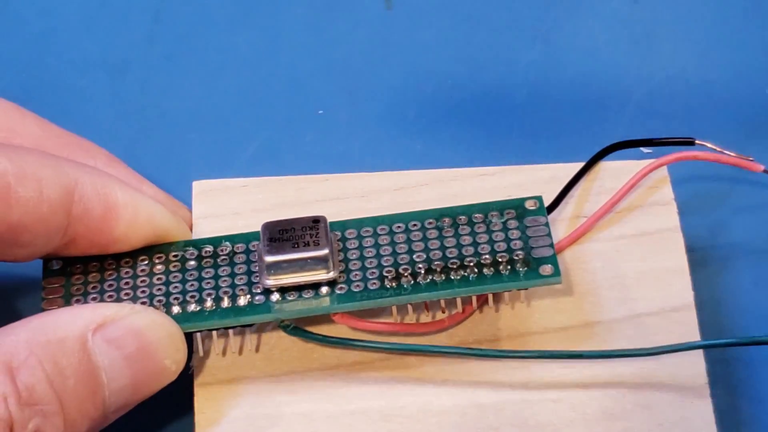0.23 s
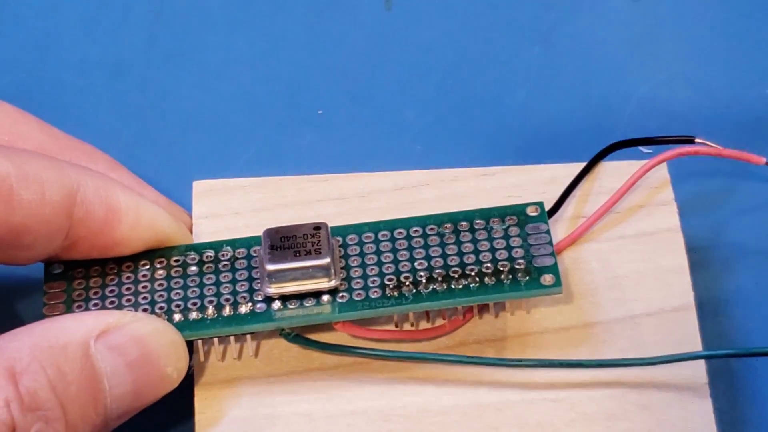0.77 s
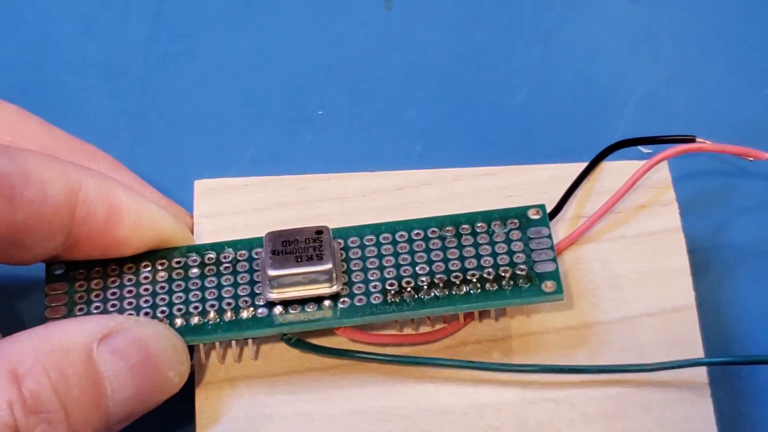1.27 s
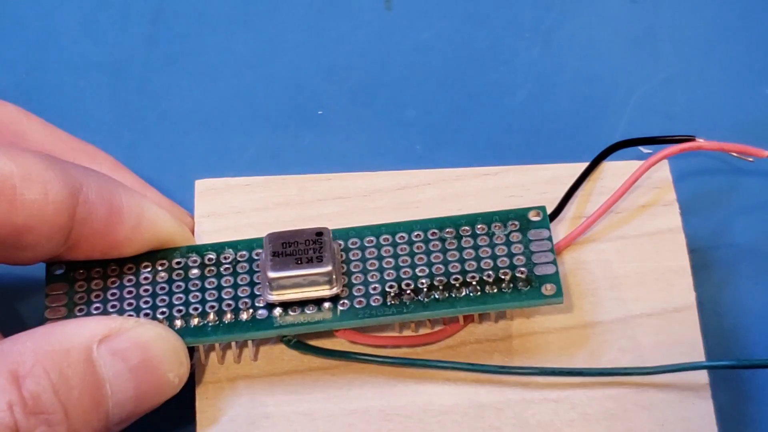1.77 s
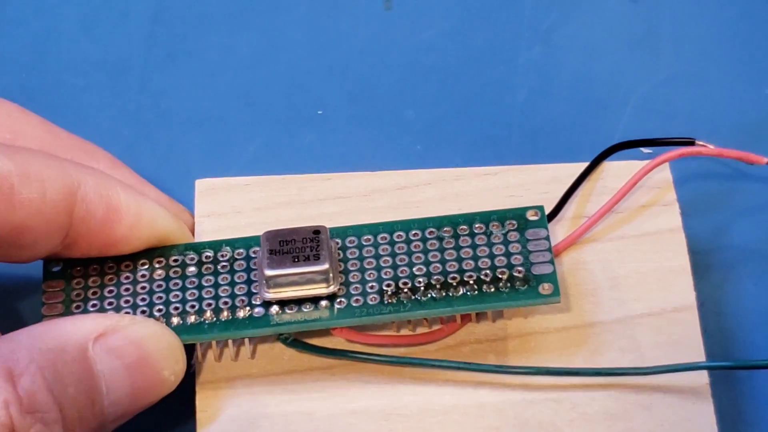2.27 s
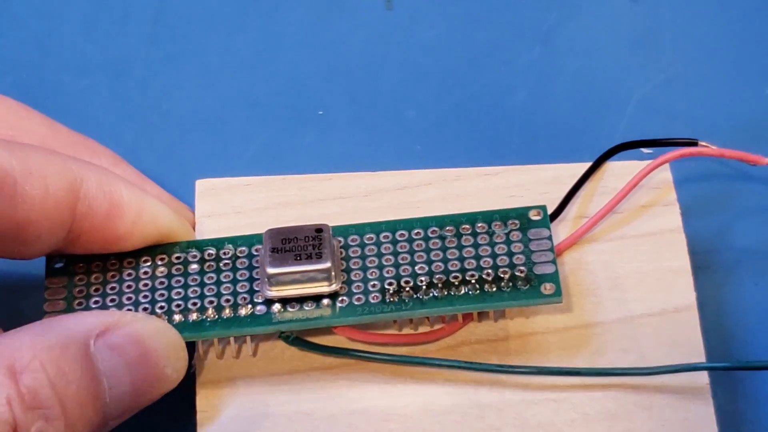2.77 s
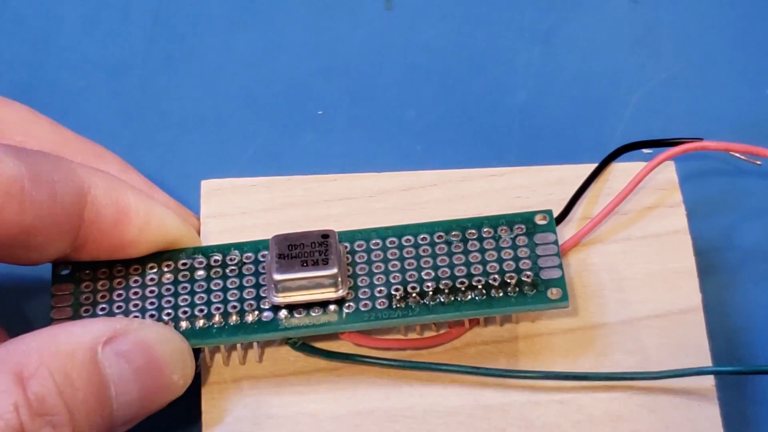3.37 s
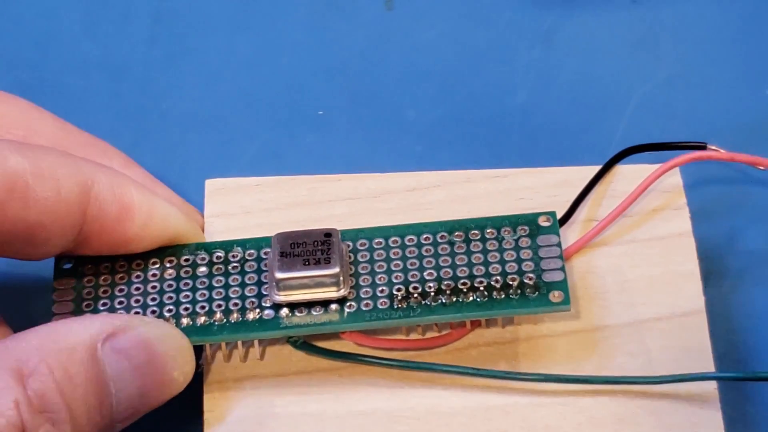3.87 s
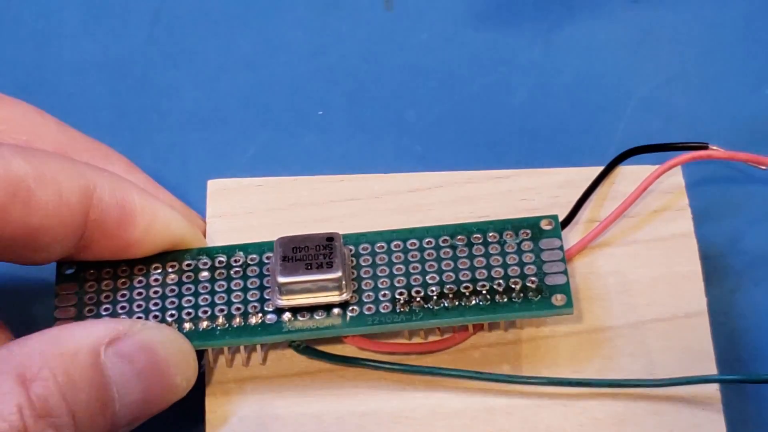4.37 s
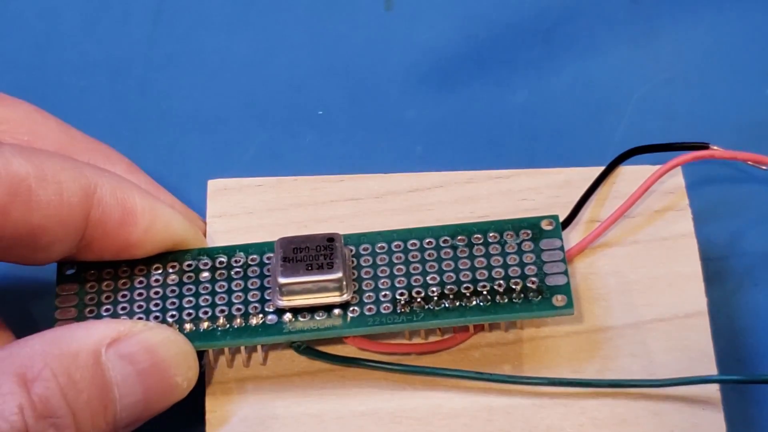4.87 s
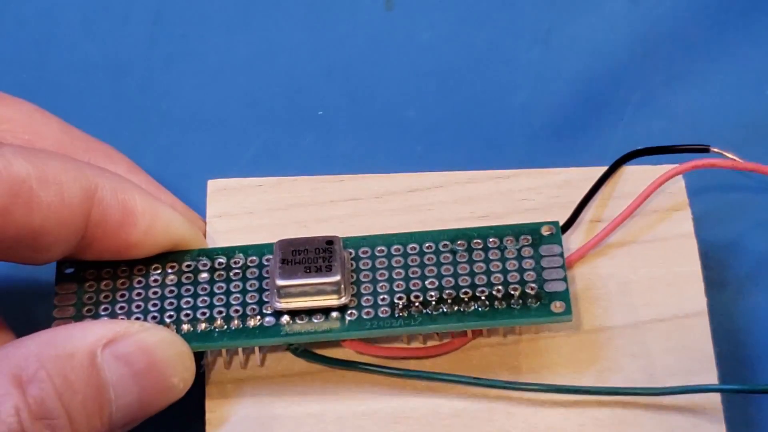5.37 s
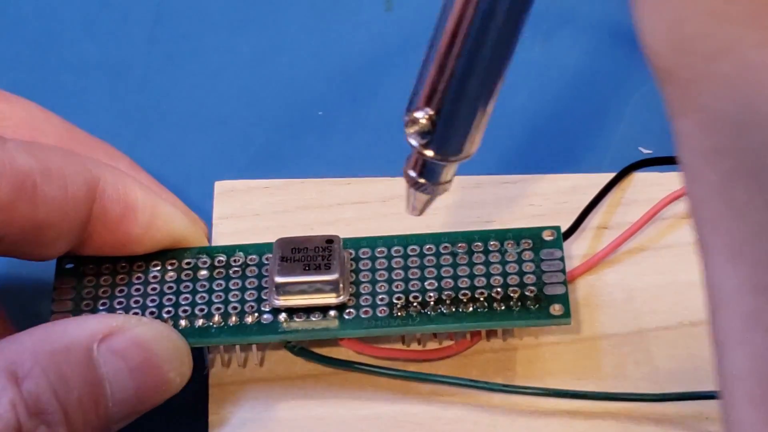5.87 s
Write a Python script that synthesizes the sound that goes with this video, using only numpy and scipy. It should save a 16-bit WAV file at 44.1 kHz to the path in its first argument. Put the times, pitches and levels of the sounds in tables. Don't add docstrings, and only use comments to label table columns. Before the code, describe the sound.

Dry skin and sleeve rubbing with dull bench knocks opens, fading to quiet handling. A hand-held plunger tool is then cocked and released three times, each a sharp click answered by a harder, heavier crack, with brief rattle and faint spring ringing. Between pairs are ticks, soft bumps and piston scrapes. Close, dry microphone, short room reflections, soft fan hum, and a tiny wire ping at the end.

```python
import sys
import numpy as np
from scipy import signal
from scipy.fft import rfft, irfft
from scipy.io import wavfile
from scipy.ndimage import uniform_filter1d

SR = 44100
rng = np.random.default_rng(int(sys.argv[2]) if len(sys.argv) > 2 else 0)


def to_wav(s):
    ch = np.atleast_2d(s).T
    pcm = np.round(np.clip(ch, -1, 1) * 32767)
    wavfile.write(sys.argv[1], SR, pcm.astype(np.int16))


def boost_factor(decibels):
    exponent = np.asarray(decibels, float) / 20
    return 10 ** exponent


N = 269704


def evened(x):
    return x / np.sqrt(np.mean(x ** 2) + 1e-20)


def read(points, hz):
    f, value = np.transpose(points)
    return np.interp(np.log(hz + 1), np.log(f + 1), value)


def add(mix, s, sound):
    part = mix[round(s * SR):][:len(sound)]
    part += sound[:len(part)]


def shaped(gain):
    return evened(irfft(rfft(rng.standard_normal(N)) * gain, N))


def coloured(points):
    return shaped(boost_factor(read(points, np.fft.rfftfreq(N, 1 / SR))))


def ring(modes, stretch, damping):
    t = np.arange(1024) / SR
    out = np.zeros(len(t))
    for hz, width, db in modes:
        out += boost_factor(db) * np.exp(-np.pi * width * damping * t) * np.sin(2 * np.pi * hz * stretch * t)
    return out


# frequency in Hz, density in dB per Hz.
AIR = [(15, -41.5), (25, -27.5), (87, -1.5), (172, -4), (304, -9), (368, -3), (524, -21), (1030, -14),
       (2400, -27), (4480, -27.5), (6210, -23.5), (7710, -22.5), (9330, -24), (15200, -49), (16500, -47)]
# centre in Hz, width in Hz, level in dB.
FANS = [
    (59, 20, -73.5),
    (102.4, 14, -69),
    (231, 130, -70.5),
    (9600, 300, -87),
    (9500, 50, -95),
]


def room_tone():
    hz = np.fft.rfftfreq(N, 1 / SR)
    out = boost_factor(-69.5) * coloured(AIR)
    for centre, width, db in FANS:
        out += boost_factor(db) * shaped(1 / (1 + (2 * (hz - centre) / width) ** 2))
    return out


# frequency in Hz, t60 in seconds.
REVERB = [(100, 0.6), (500, 0.33), (1500, 0.12), (3000, 0.18), (4500, 0.21), (6500, 0.097), (10000, 0.038),
          (15000, 0.043)]
# delay in seconds, gain.
ECHOES = [(.0025, 0.23), (.004, -0.1), (.007, 0.15), (.0095, -.15), (0.0128, -0.0099)]


def room(x, wet_db):
    taps = np.zeros(SR // 2)
    at = np.arange(120, SR // 2 - 12, 12)
    taps[at + rng.integers(0, 12, len(at))] = rng.choice([-1., 1.], len(at))
    hz, t, z = signal.stft(taps, SR, nperseg=128)
    decay = boost_factor(-60 * t / read(REVERB, hz)[:, None])
    tail = signal.istft(z * decay, SR, nperseg=128)[1]
    tail *= boost_factor(wet_db) / np.linalg.norm(tail)
    for s, gain in ECHOES:
        tail[round(s * SR)] += gain
    return signal.fftconvolve(x, tail)[:N]


# frequency in Hz, level in dB.
RUB = [(900, -30.5), (1300, 3), (1900, 3), (2400, -1), (2900, 2), (3500, -16), (4500, -45)]
HISS = [(2500, -35.5), (3600, -8.5), (4100, -1), (4700, -2.5), (5500, 1.5), (6200, 1.5), (7200, -0.5),
        (8200, -3.5), (10000, -8.5), (12000, -30.5)]
FIZZ = [(7000, -27), (10000, 8.5), (13000, 3), (15500, -1), (17000, -20.5)]
RUMBLE = [(60, -14.5), (150, 2.5), (300, -6), (600, -4), (1000, -11.5), (1800, -32)]
# time in seconds, effort in dB.
HANDLING = [(0, 7.5), (.3, 9.5), (.55, 9), (.62, -2), (1.03, 1), (1.29, -5), (1.67, -8.5), (1.84, 3.5),
            (2.5, -2), (3.13, -3), (3.37, 4.5), (3.92, -6), (4.11, -4.5), (4.38, 9.5), (4.87, -3.5),
            (5.1, -6), (5.45, -1.5), (5.8, -6.5)]
# level at middle effort in dB, growth in dB per dB of effort.
FRICTION = [
    (-78, 0.94),
    (-76.5, 0.67),
    (-88, 0.55),
    (-71.5, 0.37),
]
# middle in seconds, length in seconds, level in dB, pressure 0-1.
BRUSHES = [(0.095, 0.087, -61, 0.58), (0.232, 0.22, -70, .05), (0.675, 0.045, -86, .01),
           (0.821, 0.14, -69.5, 0), (1.019, 0.12, -60, 0.2), (1.35, 0.24, -73.5, 0.2),
           (1.567, 0.16, -73.5, 0.4), (1.825, 0.059, -74, 0.92), (2.055, 0.053, -63.5, 1.05),
           (2.311, 0.027, -57.5, 0.47), (2.748, 0.08, -80, 0.11), (3.272, 0.094, -72, 0.94),
           (3.45, 0.047, -70, 1.09), (3.675, 0.026, -61, 0.68), (3.847, 0.13, -77.5, .3),
           (4.034, 0.087, -66, 0), (4.303, 0.087, -73, 0.86), (4.644, 0.0303, -65, 0.5),
           (5.091, 0.039, -60.5, 0.58), (5.165, 0.079, -73, .4), (5.27, .12, -73, .3),
           (5.303, 0.072, -94, 1.08), (5.433, 0.084, -82, 1.17), (0.868, 0.077, -82, 1.1),
           (0.379, 0.16, -85, 1.1), (0.47, 0.088, -77, 0.94)]


def slides():
    t = np.arange(N) / SR
    effort = np.interp(t, *np.transpose(HANDLING))
    gains = np.array([boost_factor(db + share * effort) for db, share in FRICTION])
    for middle, length, db, press in BRUSHES:
        rub_db, fizz_db = -26 + 33 * press, -7 - 17 * press
        layers = db + np.array([rub_db, 0, fizz_db])
        swell = np.cos(np.pi * np.clip((t - middle) / length, -.5, .5)) ** 1.2
        gains[:3] += boost_factor(layers)[:, None] * swell
    grain = boost_factor(2.0 * evened(uniform_filter1d(rng.standard_normal(N), 300)))
    return grain * sum(g * coloured(c) for g, c in zip(gains, (RUB, HISS, FIZZ, RUMBLE)))


# start in seconds, level in dB, frequency in Hz.
THUDS = [(0.181, -53, 304), (.35, -50, 424), (.447, -53, 344), (.52, -53, 179), (.85, -47.5, 387),
         (2.099, -52, 251), (2.148, -52, 290), (2.328, -36, 73.4), (2.339, -49, 181), (2.36, -55.5, 400),
         (3.52, -42.5, 293), (3.703, -44.5, 165.7), (3.706, -46, 70.3), (4.086, -51.5, 290),
         (4.465, -51.5, 188), (4.472, -40, 261), (4.676, -31, 252), (4.677, -41, 492), (5.4, -50, 97),
         (5.4, -51, 145.7)]
# frequency in Hz, t60 in seconds.
THUD_RING = [(70, 0.23), (150, .11), (200, 0.22), (250, 0.14), (310, 0.047), (480, 0.15)]
# start in seconds, level in dB, frequency in Hz, t60 in seconds.
PING = (5.9505, -43, 6900, .012)


def thuds():
    out, t = np.zeros(N), np.arange(SR // 2) / SR
    jolts = [(*row, read(THUD_RING, row[2])) for row in THUDS]
    for s, db, hz, t60 in jolts + [PING]:
        wobble = .3 * evened(uniform_filter1d(rng.standard_normal(len(t)), 400))
        envelope = boost_factor(db - 60 * t / t60) * (1 - np.exp(-t / .002))
        add(out, s, envelope * np.sin(2 * np.pi * hz * t + wobble))
    return out


# frequency in Hz, width in Hz, level in dB.
BORE = [(1450, 190, -8), (1852, 220, 2.5), (2817, 360, 2), (3960, 820, 7), (5453, 450, -4.5),
        (7460, 150, -5), (8760, 600, -10)]
# start in seconds, end in seconds, level in dB.
STROKES = [
    (1.801, 2.076, -73.5),
    (3.221, 3.327, -66.5),
    (3.331, 3.487, -70.5),
    (3.892, 3.953, -74.5),
    (4.265, 4.454, -67),
    (4.998, 5.245, -73.5),
]


def piston():
    noise = evened(signal.oaconvolve(rng.standard_normal(N), ring(BORE, 1, 0.31), "same"))
    noise = signal.sosfilt(signal.butter(4, [1150, 10000], "band", fs=SR, output="sos"), noise)
    out = np.zeros(N)
    for start, end, db in STROKES:
        part = noise[round(start * SR):round(end * SR)]
        add(out, start, boost_factor(db) * part * signal.windows.tukey(len(part), .15))
    return out


# frequency in Hz, level in dB, t60 in seconds.
COIL = [(1253, -2.5, 0.41), (1385, -3.5, 7.4), (1390, -4, 3.7), (1600, -2.5, 0.51), (1800, -1, 3.5),
        (1760, 0, 1.9), (1830, -5, 1.), (2175, -4, 0.29)]
# start in seconds, level in dB.
TWANGS = [
    (2.086, -71.5),
    (2.326, -83),
    (3.48, -80),
    (3.707, -65.5),
    (4.448, -72),
    (4.674, -64.5),
]
DAMPED_S = [2.32, 2.6, 3.7, 3.815, 4.67, 4.99]


def spring():
    out, t = np.zeros(N), np.arange(SR // 2) / SR
    for (s, level_db), stop in zip(TWANGS, DAMPED_S):
        x = np.zeros(len(t))
        for hz, db, t60 in COIL:
            a, b = uniform_filter1d(rng.standard_normal((2, len(t))), 300)
            partial = a * np.sin(2 * np.pi * hz * t) + b * np.cos(2 * np.pi * hz * t)
            x += boost_factor(db - 60 * t / t60) * evened(partial)
        hand = np.exp(-np.maximum(t + s - stop, 0) / 0.02)
        add(out, s, boost_factor(level_db) * x * hand)
    return out


def struck(rows, reach):
    s, db, lean, wall = np.transpose(rows)
    tip_db, tip_share, bench_db, bench_share, loss = reach
    tip = db + tip_db + tip_share * lean
    bench = db + bench_db + bench_share * lean - loss * wall
    return np.transpose([s, db + wall, db - lean, db + lean, tip, bench])


# frequency in Hz, width in Hz, level in dB.
BARREL = [(2500, 1100, -23.5), (2920, 250, 23), (3380, 490, 6)]
GRIP = [(1340, 640, -12.5), (1620, 890, -2.5), (1700, 360, 19)]
LATCH = [(4250, 180, -3), (5010, 700, 4.5), (6100, 900, 6)]
TIP = [(7800, 910, 5), (9306, 520, 5), (10700, 640, -8), (12286, 610, -15.5), (14900, 1200, -16.5)]
BENCH = [(322, 1000, 12), (546, 130, -4.5), (849, 820, -1)]
# low edge in Hz, high edge in Hz, rattle in dB, rattle t60 in seconds.
PARTS = [
    (1880, 3930, -21, 0.1),
    (1100, 2800, -21.5, 0.089),
    (3820, 6900, -26.5, 0.1),
    (6700, 15000, -22.5, 0.18),
    (191, 1000, -12, 0.093),
]


def blows(rows, crack_s, spread, damping, gain_db, rattle_db):
    out, t = np.zeros(N), np.arange(SR // 4) / SR
    chance = rng.standard_normal((len(rows), 2, len(t)))
    detune = rng.uniform(-1, 1, (len(rows), 5))
    for (s, *levels), (contacts, loose), shifts in zip(rows, chance, detune):
        drive = (0.39 * contacts * np.exp(-t / crack_s) + (t == 0))[:512]
        drive[round(.00036 * SR)] += .8
        chatter = loose * boost_factor(2.7 * evened(uniform_filter1d(contacts, 250)))
        parts = zip((BARREL, GRIP, LATCH, TIP, BENCH), PARTS, levels, shifts)
        for modes, (lo_hz, hi_hz, tail_db, t60), db, shift in parts:
            band = signal.butter(3, [lo_hz, hi_hz], "band", fs=SR, output="sos")
            body = signal.sosfilt(band, ring(modes, 1 + spread * shift, damping))
            crack = np.convolve(drive, body)
            add(out, s, boost_factor(db + gain_db) * crack / abs(crack).max())
            brief = body * np.exp(-t[:len(body)] / .0008)
            rattle = evened(signal.sosfilt(band, signal.oaconvolve(chatter, brief, "same")))
            rattle *= 1 - np.exp(-t / 0.00067)
            add(out, s, boost_factor(db + gain_db + tail_db + rattle_db - 60 * t / t60) * rattle)
    return out


# start in seconds, strength in dB,
# lean from grip end toward latch end in dB, barrel wall caught in dB.
KNOCKS = [(0.0677, -43, 1, -21), (0.143, -56.5, -13.5, -2), (0.176, -33.5, -3, -6), (0.2857, -45.5, 2, 0),
          (0.3465, -40.5, -4, -9), (0.4432, -39, -4.5, -16), (0.5009, -60, -16, -8), (1.7835, -67, 4, 0),
          (2.2469, -50.5, -1.5, -14.5), (2.798, -50.5, -6, -3), (3.2466, -56.5, 15, 2.5),
          (3.6531, -50, -2.5, -5), (4.0195, -59.5, 12, -26.5), (4.0804, -34, -3.5, -1.5),
          (4.363, -56.5, -8.5, 5), (4.9909, -52.5, 1.5, -8.5), (5.2906, -64, -12, -29),
          (5.339, -58.5, -3.5, -6), (5.4062, -44.5, -7, -19)]
# start in seconds,
# strength, lean and wall in dB.
TICKS = [(0.846, -44.5, -5, 0.5), (0.8957, -54.5, -5, 12), (1.804, -48.5, 3, 0), (2.0386, -35, -0.5, 1.5),
         (2.149, -37.5, 6.5, -6), (2.2265, -45, 0, -1.5), (3.1938, -51, 5, 1), (3.318, -44.5, -6, 7.5),
         (3.4378, -32.5, 1.5, -0.5), (3.525, -30, 7, -3), (3.673, -46.5, 8.5, -1), (3.797, -50, -6, 5),
         (3.894, -50.5, 8.5, 0.5), (4.42, -36.5, -2.5, -2.5), (4.435, -41.5, -4, -1.5),
         (4.474, -29.5, 7.5, -13), (4.638, -54.5, 1.5, 3), (4.654, -52.5, 7, 0.5), (3.8346, -54, 9, 3)]
# tip in dB, tip share of lean, bench in dB, bench share of lean, bench loss per wall dB.
KNOCK_REACH = (-11.5, 0.8, -10, -1.08, 0.19)
TICK_REACH = (-16, 2.8, -16, 0.4, -0.07)


def light_touches():
    rows = np.vstack([struck(KNOCKS, KNOCK_REACH), struck(TICKS, TICK_REACH)])
    hits = blows(rows, crack_s=0.00061, spread=.06, damping=1.6, gain_db=0.83, rattle_db=0.56)
    return signal.sosfilt(signal.butter(2, 9000, fs=SR, output="sos"), hits)


# start in seconds, strength, lean and wall in dB.
FLICKS = [
    (0.3067, -59.5, -1, 1),
    (0.6481, -56, 6.5, -29),
    (0.9757, -81, 9, -5),
    (5.2743, -60.5, 1, -17),
]
# tip in dB, tip share of lean, bench in dB, bench share of lean, bench loss per wall dB.
FLICK_REACH = (-2.5, 2.57, 10.5, -1.9, -0.11)


def flicks():
    rows = struck(FLICKS, FLICK_REACH)
    return blows(rows, crack_s=0.001, spread=0.094, damping=1.3, gain_db=1.9, rattle_db=-1.0)


# start in seconds, strength, lean and wall in dB.
SNAPS = [(2.0835, -15.5, 8, 8.5), (2.3233, -21.5, 2, 6), (2.3257, -14.5, 8, 3), (2.3264, -9, -1, -5),
         (2.3284, -24, -3, -5.5), (3.4795, -19, 9, 14), (3.7006, -33, 6, 10.5), (3.7031, -9.5, 2, -1),
         (3.7055, -15.5, 4, 0), (4.4478, -15, 7, 10), (4.6723, -26.5, -0.5, 8), (4.6742, -9, 4.5, -1)]
# tip in dB, tip share of lean, bench in dB, bench share of lean, bench loss per wall dB.
SNAP_REACH = (-11.5, 1.87, -27, 0.7, 1)


def snaps():
    rows = struck(SNAPS, SNAP_REACH)
    return blows(rows, crack_s=0.00082, spread=.012, damping=0.99, gain_db=1.6, rattle_db=0.1)


# frequency in Hz, side below mid in dB.
APART = [(60, -27), (150, -21), (380, -21.5), (950, -13), (2380, -23), (5980, -19), (15000, -25)]
# frequency in Hz, left over right in dB.
LEAN = [(60, -0.53), (180, 0.5), (550, -3.5), (1650, -1), (4970, -1.5), (15000, -1)]
# frequency in Hz, side level in dB.
WALLS = [(100, -37), (600, -18), (1300, -20), (2800, -27.5), (6500, -28), (9000, -12), (15000, -5)]


def scene():
    hz = np.fft.rfftfreq(N, 1 / SR)
    steady = slides() + room_tone()
    low = thuds()
    hits = snaps() + light_touches() + flicks()
    mid = hits + room(hits, wet_db=-12.5) + low + spring() + piston() + steady
    lean = np.tanh(read(LEAN, hz) * np.log(10) / 40)
    unrelated = rfft(np.roll(steady, SR // 3)) * boost_factor(read(APART, hz) - 8)
    side = irfft(rfft(steady) * lean + unrelated, N)
    side = side + irfft(rfft(room(hits + low, wet_db=-15)) * boost_factor(read(WALLS, hz)), N)
    return np.array([mid + side, mid - side])


def top_cut(x):
    return signal.sosfilt(signal.butter(12, 16850, fs=SR, output="sos"), x)


def record(dry):
    notch_hz, notch_width_hz, notch_share = 3790, 340, 0.23
    b, a = signal.iirpeak(notch_hz, notch_hz / notch_width_hz, SR)
    heard = dry - notch_share * signal.lfilter(b, a, dry)
    heard = signal.sosfilt(signal.ellip(8, .5, 40, 15800, fs=SR, output="sos"), heard)
    return top_cut(np.clip(heard, -.97, .97))


dry = scene()
out = record(dry)
to_wav(out)
```